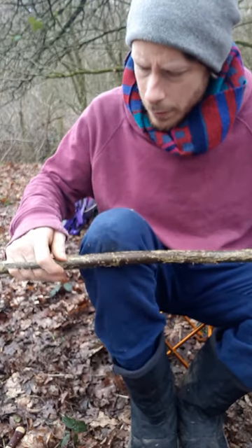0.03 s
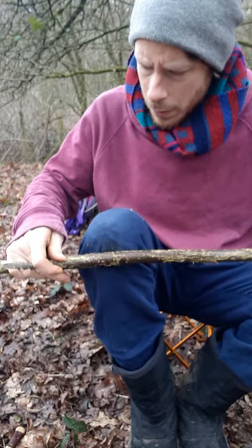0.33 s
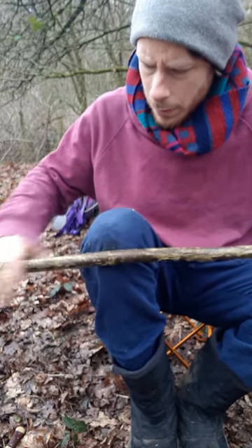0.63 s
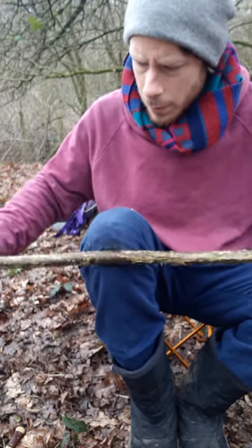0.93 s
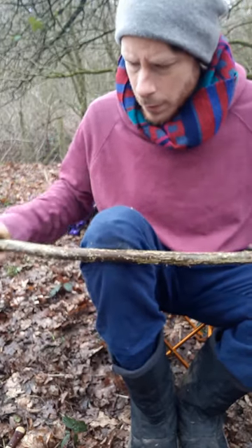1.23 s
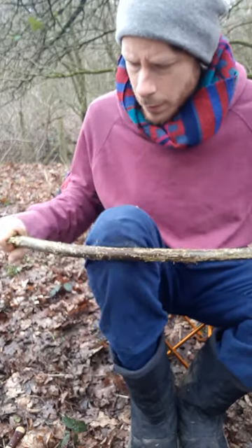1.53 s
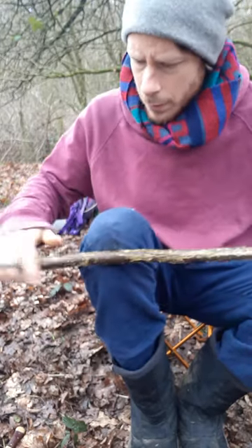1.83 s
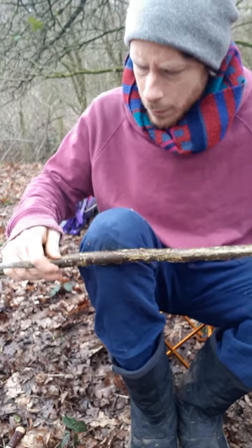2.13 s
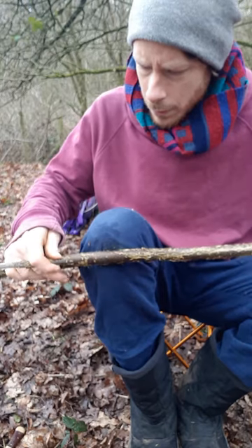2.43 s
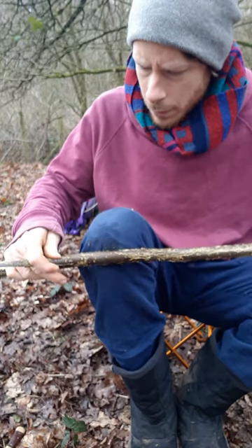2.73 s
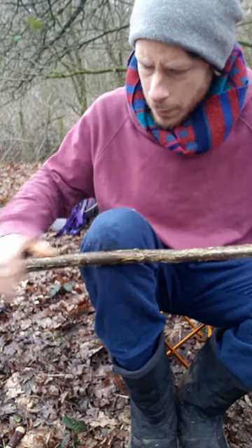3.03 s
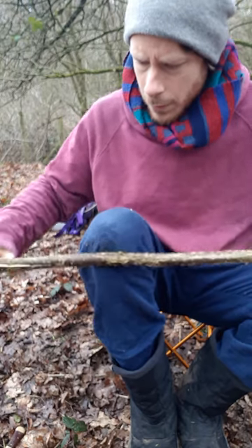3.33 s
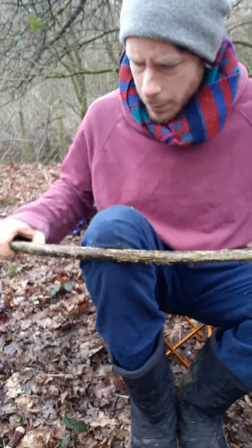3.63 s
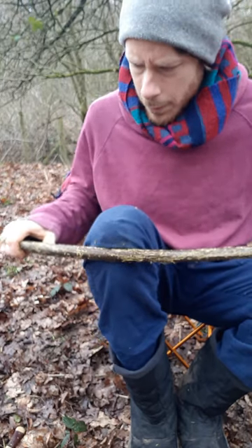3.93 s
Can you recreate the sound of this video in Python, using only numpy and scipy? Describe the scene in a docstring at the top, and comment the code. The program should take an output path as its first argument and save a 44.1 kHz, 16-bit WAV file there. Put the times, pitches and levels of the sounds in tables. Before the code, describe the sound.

Close on the left, a dry stick snaps and crackles in short groups, loudest midway, as it is flexed. A hand and sleeve brush the bark in the pauses, with faint woodland birds and a distant rumble behind.

```python
"""Bending a dry hazel rod

The rod is flexed over a knee, close to the left microphone: fibres snap, its bending modes ring
briefly and the trees scatter the sound back. Between bends a hand and sleeve rub along the bark.
An echo fades at the start; small birds whistle far off, over a low distant rumble and a faint hum."""
import sys
import numpy as np
from scipy import signal
from scipy.fft import rfft, irfft, next_fast_len
from scipy.io import wavfile
from scipy.ndimage import map_coordinates

SR = 44100
rng = np.random.default_rng(int(sys.argv[2]) if len(sys.argv) > 2 else 0)


def unload_wav(signal):
    """Save mono or channel-first audio to the path in sys.argv[1] as 16-bit WAV at rate SR, clipped to [-1, 1]."""
    wavfile.write(
        sys.argv[1],
        SR,
        np.round(np.clip(np.atleast_2d(signal).T, -1, 1) * 32767).astype(np.int16),
    )


N = 176400


def amp(db):
    """Amplitude ratio of a level in decibels."""
    return 10 ** (np.asarray(db) / 20)


def unit(x):
    """Normalisation to an rms of 1."""
    return x / np.sqrt(np.mean(x ** 2) + 1e-20)


def along(points, hz):
    """Interpolation of (frequency [Hz], value) points on a logarithmic frequency axis."""
    f, v = np.transpose(points)
    return np.interp(np.log(hz + 1), np.log(f + 1), v)


def fade(t, t60):
    """Exponential decay, 60 dB down after t60."""
    return np.exp(-np.log(1000) * t / t60)


def wobble(rate):
    """Smooth random modulation: a spline through rate Gaussian values a second."""
    return map_coordinates(rng.standard_normal(N // 8), [np.arange(N) * rate / SR], mode="mirror")


def filtered(x, response):
    """Linear filtering: the spectrum of x is multiplied by a frequency response."""
    size = next_fast_len(x.shape[-1] + SR // 10)
    return irfft(rfft(x, size) * response(np.fft.rfftfreq(size, 1 / SR)), size)[..., :x.shape[-1]]


def noise(spectrum, size=N):
    """Spectral shaping of white noise, at an rms of 1."""
    return unit(filtered(rng.standard_normal(size), lambda hz: amp(along(spectrum, hz))))


def pulse(spectrum, stretch=1, size=1024):
    """A minimum-phase pulse of peak 1: folding the cepstrum makes the given spectrum causal."""
    hz = np.fft.rfftfreq(size, 1 / SR)
    cepstrum = irfft(np.log(amp(along(spectrum, hz / stretch))))
    cepstrum[1:size // 2] *= 2
    cepstrum[size // 2 + 1:] = 0
    wave = irfft(np.exp(rfft(cepstrum)))
    return wave / np.abs(wave).max()


def tail(t60s):
    """Diffuse reverberation: stereo noise, of energy 1 on the left, decaying at a rate set by frequency."""
    hz, t, spectra = signal.stft(rng.standard_normal((2, SR * 2 // 3)), SR, nperseg=256)
    response = signal.istft(spectra * fade(t, along(t60s, hz)[:, None]), SR, nperseg=256)[1]
    return response / np.linalg.norm(response[0])


def near(x):
    """Level and phase differences: a source close on the left reaches the right weaker and later."""
    # right channel relative to left (frequency [Hz], gain [dB])
    gain = [(100, 0), (700, -11), (2500, -16), (5400, -16), (9000, -15.5), (14000, -19)]
    # lag of the right channel (frequency [Hz], phase [rad])
    lag = [(100, .1), (1000, 0.86), (1800, 2.15), (2500, 0.32), (4400, 1.4), (5500, 1.5), (7000, 0.45),
           (10500, .9), (15000, 2.5)]
    right = filtered(x, lambda hz: amp(along(gain, hz)) * np.exp(-1j * along(lag, hz)))
    return np.array([x, right])


def distant_rumble():
    """Partially coherent noise: long waves reach both microphones alike, short ones do not."""
    # spectrum of rumble and air (frequency [Hz], relative level [dB])
    spectrum = [(20, -29), (42, -6.5), (70, -1), (150, -2), (200, -10), (290, -10), (380, -16), (520, -15),
                (750, -9.5), (1000, -6), (1350, -14.5), (1700, -13), (2250, -21.5), (2750, -23),
                (3500, -29), (4800, -29.5), (7000, -40.5), (10000, -38.5), (16000, -35.5)]
    # likeness of the two channels (frequency [Hz], coherence [ratio])
    coherence = [(60, 0.98), (290, 0.59), (640, .55), (1400, 0.34), (3100, 0.041)]
    # excess of left over right (frequency [Hz], level difference [dB])
    balance = [(100, 0.5), (200, 5), (380, 10), (700, 16), (1300, 17), (2400, 14.5), (4400, 10.5),
               (8100, -0.5), (15000, 0.5)]

    def mid_side_gains(hz):
        angle = np.arccos(np.clip(along(coherence, hz), -1, 1)) / 2
        return np.array([np.cos(angle), np.sin(angle)])

    def channel_gains(hz):
        left_share = 1 / (1 + amp(-along(balance, hz)))
        return 2 * np.array([left_share, 1 - left_share])

    mid, side = filtered(np.array([noise(spectrum), noise(spectrum)]), mid_side_gains)
    air = filtered(np.array([mid + side, mid - side]), channel_gains)
    return amp(-58 + 1.2 * wobble(rate=2.72)) * air


def hum():
    """Random frequency and amplitude modulation make four faint low tones waver."""
    # tones of the hum (frequency [Hz], rms level [dB])
    tones = [(100, -70.5), (164, -70), (297, -75.5), (477.3, -78)]
    total = np.zeros(N)
    for hz, db in tones:
        phase = 2 * np.pi * np.cumsum(hz + 3.5 * wobble(rate=14)) / SR
        flutter = unit(amp(3 * wobble(rate=11)))
        total += amp(db) * np.sqrt(2) * np.sin(phase) * flutter
    return total


def opening_echo():
    """Reverberant decay: a hollow echo with a few resonant bands dies away among the trees."""
    # broadband part (frequency [Hz], relative level [dB])
    spectrum = [(150, -32), (320, 4.5), (580, -6.5), (820, -3.5), (1100, -12), (1420, 3), (1600, -5),
                (1760, 8), (2200, -3), (2700, -5), (3050, -10.5), (3550, -10), (4400, -13.5), (6000, -15),
                (8500, -40), (15000, -31)]
    # resonances (frequency [Hz], width [Hz], relative level [dB])
    bands = [(297, 62, -4.5), (836, 82, -2.5), (1386, 34, -2), (1745, 56, -1), (2260, 50, -12),
             (2750, 74, -3), (3460, 140, -13)]

    def resonances(hz):
        return sum(amp(db) / (1 + (2 * (hz - centre) / width) ** 2) for centre, width, db in bands)

    ringing = unit(filtered(rng.standard_normal(N), resonances))
    echo = amp(-43) * noise(spectrum) + amp(-47) * ringing
    return near(echo * fade(np.arange(N) / SR, t60=0.63))


def cloth():
    """Friction of sleeve and trouser cloth: a soft low rustle swells as the arm moves."""
    # movements (peak time [s], width [s], level [dB])
    moves = [(.21, 0.16, -64.5), (.84, 0.064, -64), (3.36, 0.19, -65.5), (3.799, 0.17, -66)]
    # rustle spectrum (frequency [Hz], relative level [dB])
    spectrum = [(30, -22), (90, 0), (200, 2), (300, -5.5), (450, -25), (1500, -26), (8000, -54)]
    t = np.arange(N) / SR
    envelope = sum(amp(db) * np.exp(-((t - s) / width) ** 2) for s, width, db in moves)
    return noise(spectrum) * envelope


def rubbing():
    """Sliding friction: the hand lands on rough bark and strokes it, giving a grainy rasp and hiss."""
    # strokes (peak time [s], rise [s], fall [s], rasp level [dB], hiss level [dB])
    strokes = [(.69, 0.048, 0.067, -60, -56.5), (.89, 0.1, 0.048, -63.5, -71.5),
               (1.825, 0.083, 0.085, -57, -56), (3.10, 0.063, 0.096, -64, -64.5),
               (3.29, 0.024, 0.037, -64, -77)]
    # the hand lands or a flake ticks (time [s], rasp level [dB], hiss level [dB], t60 [s])
    grips = [(.091, -45, -58, 0.018), (0.361, -51, -49, 0.023), (0.56, -53.5, -58.5, .035),
             (.69, -69, -54, 0.085), (.728, -61, -59, 0.049), (1.654, -52.5, -66, 0.048),
             (2.987, -51.5, -64, 0.095), (3.045, -80, -58, 0.037), (3.105, -61, -59, 0.15),
             (3.802, -61, -57, 0.033)]
    # mid-range friction noise (frequency [Hz], relative level [dB])
    rasp_spectrum = [(300, -27.5), (1500, -4.5), (3000, -2.5), (4500, 2.5), (6400, -2), (8500, -27.5),
                     (16000, -30)]
    # treble friction noise (frequency [Hz], relative level [dB])
    hiss_spectrum = [(300, -44), (8000, -29.5), (10500, -9), (13000, 1.5), (15000, 4.5), (16500, -14)]
    grip_rise_s, grain_db, flutter_db = 0.00063, 2.4, 2.06
    t, rasp, hiss = np.arange(N) / SR, np.zeros(N), np.zeros(N)
    for s, rise, fall, rasp_db, hiss_db in strokes:
        from_peak = (t - s) / np.where(t < s, rise, fall)
        rasp += amp(rasp_db) * np.exp(-from_peak ** 2 / 2)
        hiss += amp(hiss_db) * np.exp(-from_peak ** 2)
    for s, rasp_db, hiss_db, t60 in grips:
        age = np.maximum(t - s, 0)
        touch = (1 - np.exp(-age / grip_rise_s)) * fade(age, t60)
        rasp += amp(rasp_db) * touch
        hiss += amp(hiss_db) * touch
    roughness = unit(amp(grain_db * wobble(rate=570) + flutter_db * wobble(rate=42)))
    return near(roughness * (rasp * noise(rasp_spectrum) + hiss * noise(hiss_spectrum)))


def bending_wave(size=1024):
    """Dispersion: bending waves travel as the root of frequency, so a snap becomes a falling chirp."""
    # spectrum of the wave (frequency [Hz], relative level [dB])
    spectrum = [(400, -31), (1000, -17), (2150, -7.5), (2750, 3.5), (3300, -9), (4200, -1.5), (5200, -12),
                (8000, -27)]
    fastest_hz, slowest_hz = 7000, spectrum[0][0]
    lag_s = 0.0038  # delay two octaves below fastest_hz
    hz = np.fft.rfftfreq(size, 1 / SR)
    group_delay = lag_s * np.maximum(np.sqrt(fastest_hz / np.maximum(hz, slowest_hz)) - 1, 0)
    phase = 2 * np.pi * np.cumsum(group_delay) * SR / size
    wave = irfft(rfft(pulse(spectrum, size=size)) * np.exp(-1j * phase))
    return wave * np.cos(np.linspace(0, np.pi / 2, size)) ** 2


def rod_ring(t, pitch_ratio):
    """Free vibration: the rod rings as a sum of damped bending modes of alternating sign."""
    # bending modes (frequency at pitch ratio 1 [Hz], relative level [dB], t60 [s])
    modes = [(840, -23.5, 0.047), (1200, -20.5, 0.04), (1435, -17.5, 0.028), (1623, -17.5, 0.035),
             (1930, -11.5, 0.025), (2317, -11, 0.012), (2600, -5.5, 0.036), (2826, 2, 0.026),
             (3150, -15, 0.018), (3410, -11, 0.028), (4030, -7, 0.025), (4500, -10, 0.025)]
    scatter_db, rise_s = 1.5, 0.00083
    ring = np.zeros(len(t))
    for k, (hz, db, t60) in enumerate(modes):
        gain = (-1) ** k * amp(db + rng.normal(0, scatter_db))
        ring += gain * fade(t, t60) * np.sin(2 * np.pi * hz * pitch_ratio * t)
    return ring * (1 - np.exp(-t / rise_s)) ** 2


def splintering(t):
    """Acoustic emission: the wood splinters for a moment in a decaying burst of noise."""
    # spectrum of the burst (frequency [Hz], relative level [dB])
    spectrum = [(100, -25), (700, -12.5), (2000, -2.5), (4800, -0.5), (6800, -5.5), (8800, -19.5),
                (12000, -7), (14800, -7.5), (17000, -24.5)]
    rise_s = 0.00072
    return noise(spectrum, size=len(t)) * fade(t, t60=0.032) * (1 - np.exp(-t / rise_s))


def cracks():
    """Brittle fracture: each parting fibre emits a pulse and excites the rod; trees scatter it back."""
    # fractures (time [s], snap level [dB], snap pitch [Hz], click level [dB], knock level [dB],
    # bending wave level [dB], ring level [dB], ring pitch [ratio], splinter level [dB], echo gain [dB])
    fractures = [(0.1193, -14.5, 5150, -24.5, -54, -31, -39, 1.02, -35, -20),
                 (0.3326, -18, 5370, -33, -45, -33, -37, 1.1, -38, -23),
                 (.3362, -9.5, 5430, -22, -42, -23, -37, 1.12, -31, -20),
                 (1.3531, -27, 4360, -40, -33, -31, -37, 1.03, -48.5, -9.5),
                 (1.4399, -42, 4350, -21, -24, -18, -27, 1, -33.5, -19),
                 (1.9075, -5, 5400, -12, -31, -35, -38.5, 1.06, -29.5, -19.5),
                 (1.9542, -7.5, 5630, -12, -28, -22.5, -31.5, 1, -28.5, -19),
                 (1.9572, -14, 5760, -16, -31, -31, -37.5, .97, -29.5, -25.5),
                 (2.2305, -25.5, 5780, -25, -43, -38.5, -50, 1.08, -44, -13.5),
                 (2.2757, -13, 5320, -20, -31, -30, -47, 1.05, -30.5, -20),
                 (2.3699, -36.5, 5700, -48, -67, -65.5, -63, 1, -77, -16),
                 (2.4094, -11.5, 5410, -21.5, -37, -36, -40, 1.15, -35, -19),
                 (2.5464, -8.5, 5270, -12.5, -29.5, -11.5, -23, 1, -24.5, -21),
                 (3.8559, -23, 4540, -25.5, -49, -25, -32, 1, -32.5, -16),
                 (3.864, -41, 5000, -35, -36, -25, -32, .62, -45, -14.5)]
    # snap before it is shifted to each fibre's pitch (frequency [Hz], relative level [dB])
    snap_spectrum = [(100, -50), (1500, -37), (3200, -21), (4300, -3.5), (5400, 2), (6900, -5),
                     (8500, -19.5), (16000, -42.5)]
    # treble click (frequency [Hz], relative level [dB])
    click_spectrum = [(100, -51.5), (8500, -41.5), (10500, -10.5), (12500, -0.5), (14500, 3.5),
                      (16000, -10), (18000, -26)]
    # mid-range knock (frequency [Hz], relative level [dB])
    knock_spectrum = [(100, -27), (600, -10.5), (1400, 2), (2800, 3), (4500, -17.5), (12000, -34.5)]
    # reverberation of the near trees (frequency [Hz], t60 [s])
    near_trees = [(200, 0.45), (2000, 0.4), (5000, 0.23), (14000, 0.19)]
    # reverberation of the far trees (frequency [Hz], t60 [s])
    far_trees = [(2000, 0.94), (6000, 0.82), (14000, 0.348)]
    # bright scattering from dry leaves (frequency [Hz], gain [dB])
    leaves = [(8000, -2), (12000, 3)]
    snap_peak_hz = 5400
    second_click_s, second_click_db = 0.00027, -1.5  # a fibre parts in two quick steps
    rebound_s, rebound_db = 0.0021, -12.5  # reflection off the body
    far_db, splinter_send_db, echo_right_db = -14.5, 10, -12.5
    direct, echo, t = np.zeros(N), np.zeros((2, N)), np.arange(SR // 10) / SR
    for s, snap_db, hz, click_db, knock_db, bend_db, ring_db, ratio, splinter_db, echo_db in fractures:
        click = amp(click_db) * pulse(click_spectrum)
        knock = amp(knock_db) * pulse(knock_spectrum)
        snap = amp(snap_db) * pulse(snap_spectrum, hz / snap_peak_hz) + click + knock
        crack = amp(ring_db) * rod_ring(t, ratio)
        add(crack, 0, snap)
        add(crack, 0, amp(bend_db) * bending_wave())
        trees = amp(echo_db) * (tail(near_trees) + amp(far_db) * tail(far_trees))
        add(echo, s, signal.fftconvolve(crack[None], trees, axes=1))
        splinter = amp(splinter_db) * splintering(t)
        splinter_echo = signal.fftconvolve(splinter[None], tail(near_trees), axes=1)
        add(echo, s, amp(echo_db + splinter_send_db) * splinter_echo)
        add(direct, s, crack + splinter)
        add(direct, s + second_click_s * rng.lognormal(0, 0.22), amp(second_click_db) * click)
        add(direct, s + rebound_s * rng.lognormal(0, 0.16), amp(rebound_db) * snap)
    bright_echo = filtered(echo, lambda hz: amp(along(leaves, hz)))
    return near(direct) + bright_echo * amp([[0], [echo_right_db]])


def add(track, s, x):
    """Superposition: x is summed into the track from s seconds on."""
    part = track[..., max(round(s * SR), 0):][..., :x.shape[-1]]
    part += x[..., :part.shape[-1]]


def chirp(hz):
    """One bird note that swells and fades; its phase is the integral of its frequency."""
    return np.sin(np.linspace(0, np.pi, len(hz))) * np.sin(2 * np.pi * np.cumsum(hz) / SR)


def birds():
    """Frequency-modulated tones: clear whistles, and farther warbles smeared by reverberation."""
    # whistles that slide and level off (time [s], length [s], start [Hz], end [Hz], level [dB])
    whistles = [(0.178, 0.062, 3650, 3590, -66), (0.705, 0.049, 3950, 3780, -59),
                (1.075, 0.072, 4210, 4050, -69), (1.666, 0.15, 5470, 5380, -62),
                (1.972, .058, 4340, 4220, -56), (2.203, 0.09, 4500, 4340, -62),
                (2.32, 0.088, 5540, 5600, -66.5), (2.46, 0.097, 5380, 5260, -64)]
    # warbles (time [s], length [s], start [Hz], end [Hz], pitch waver [ratio], relative level [dB])
    warbles = [(1.08, 0.092, 4320, 4550, .02, -67), (1.198, 0.079, 3356, 3620, 0.06, -57),
               (1.22, 0.056, 3310, 3060, .025, -58.5), (1.28, 0.077, 3890, 4180, .06, -63.5),
               (1.358, 0.077, 4140, 3940, 0.05, -57), (3.45, 0.063, 5030, 4890, .045, -67),
               (3.476, 0.096, 2590, 2475, 0.056, -62)]
    whistle_send_db, warble_direct_db, right_db, echo_t60_s = -6, -4, -19.5, 0.36
    clear, warbled = np.zeros(N), np.zeros(N)
    for s, length, start_hz, end_hz, db in whistles:
        progress = np.linspace(0, 1, int(length * SR))
        add(clear, s, amp(db) * chirp(end_hz + (start_hz - end_hz) * (1 - progress) ** 2))
    for s, length, start_hz, end_hz, waver, db in warbles:
        hz = np.linspace(start_hz, end_hz, int(length * SR))
        hz *= 1 + waver * wobble(rate=505)[:len(hz)]
        add(warbled, s, amp(db) * chirp(hz))
    scattered = warbled + amp(whistle_send_db) * clear
    echo = signal.fftconvolve(scattered[None], tail([(1, echo_t60_s)]), axes=1)[:, :N]
    return (clear + amp(warble_direct_db) * warbled + echo) * amp([[0], [right_db]])


def scene():
    """Superposition of the close rod and hand with the woodland behind them."""
    return distant_rumble() + hum() + opening_echo() + cloth() + rubbing() + cracks() + birds()


def record(dry):
    """Band limiting: a very steep low-pass filter removes the highest treble."""
    cutoff_hz = 16300
    return filtered(dry, lambda hz: 1 / np.sqrt(1 + (hz / cutoff_hz) ** 160))


dry = scene()
out = record(dry)
unload_wav(out)
```